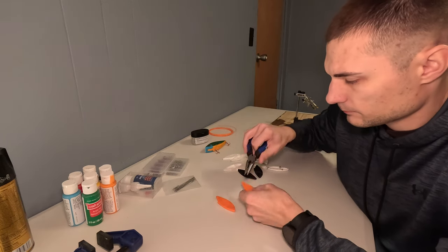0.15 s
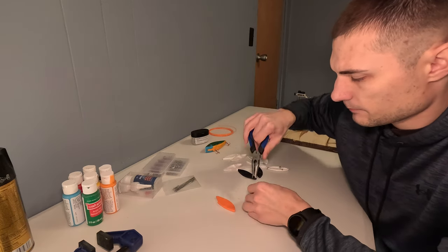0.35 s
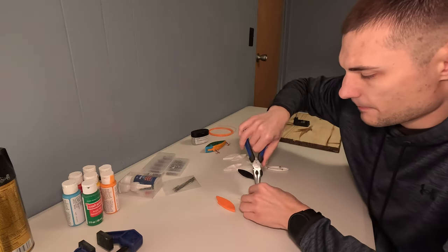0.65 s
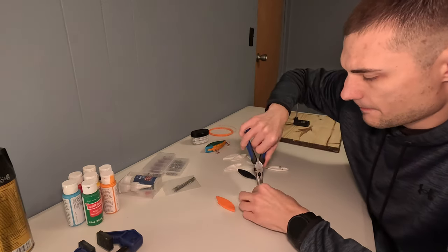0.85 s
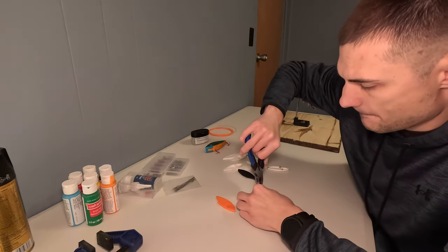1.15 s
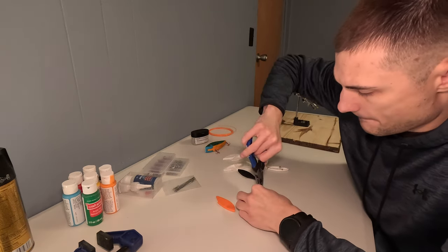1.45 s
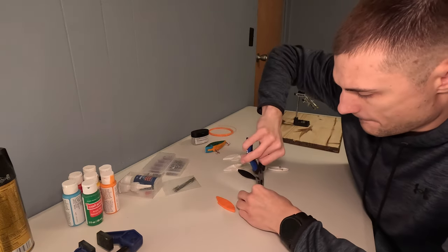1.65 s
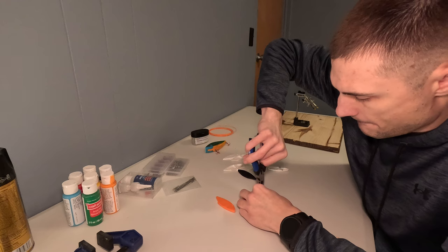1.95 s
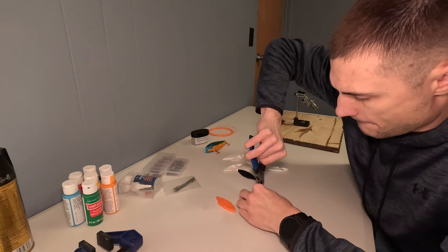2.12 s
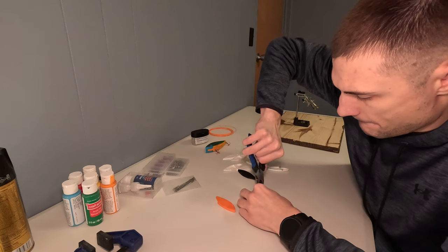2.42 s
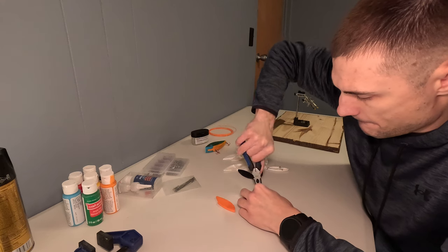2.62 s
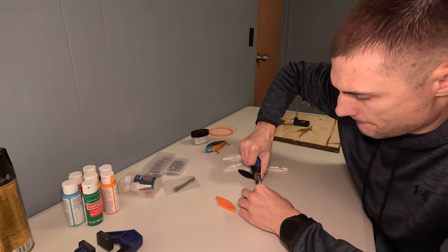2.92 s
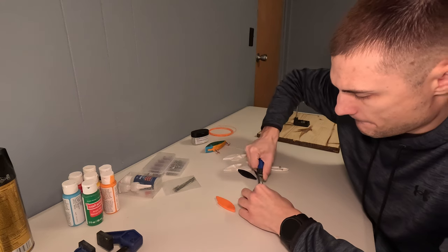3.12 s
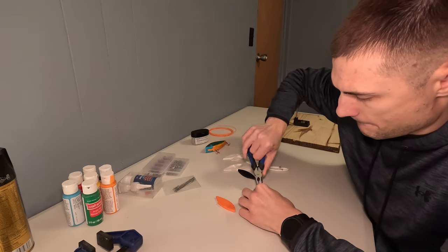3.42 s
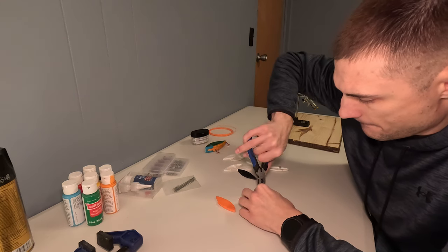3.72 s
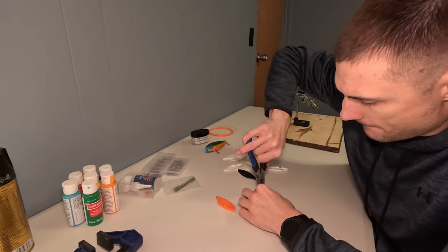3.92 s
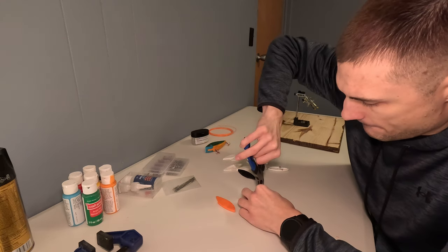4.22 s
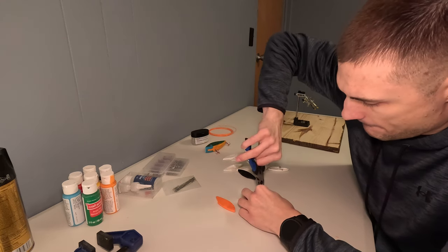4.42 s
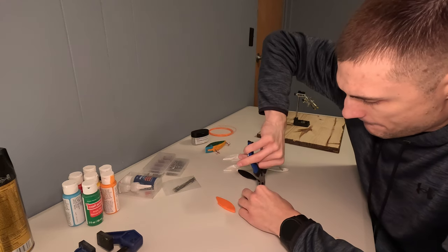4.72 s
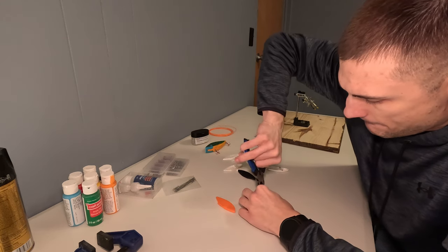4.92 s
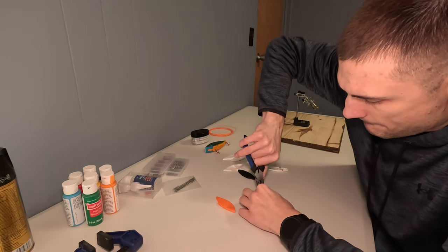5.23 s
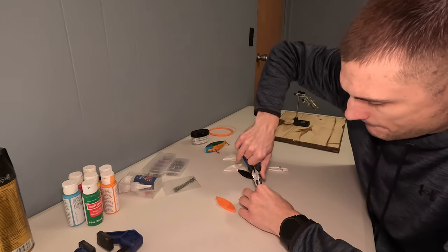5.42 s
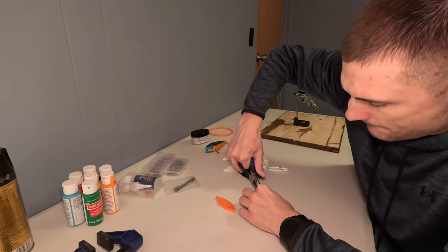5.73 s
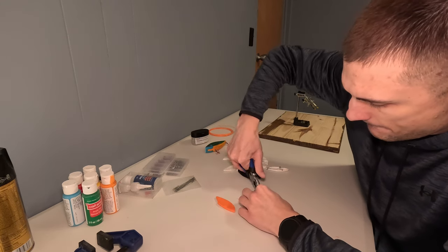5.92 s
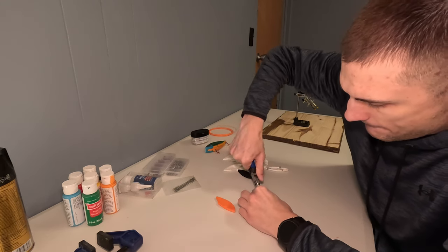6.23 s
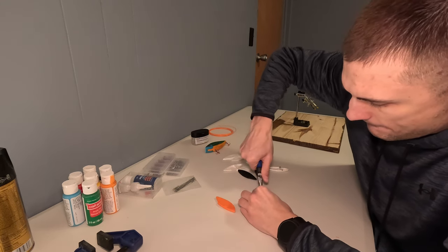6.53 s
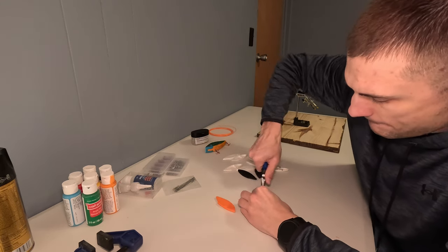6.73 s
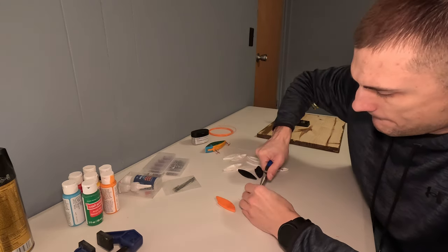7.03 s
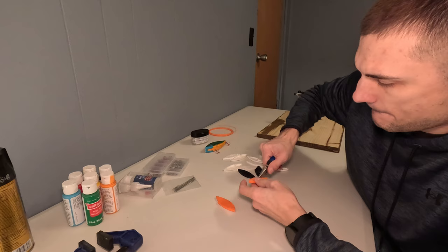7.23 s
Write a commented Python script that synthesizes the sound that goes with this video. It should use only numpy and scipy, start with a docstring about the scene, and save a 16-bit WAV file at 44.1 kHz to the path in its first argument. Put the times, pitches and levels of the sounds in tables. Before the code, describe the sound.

Sharp plastic cracks, a few very loud with a table thud, broken by knocks, brief scrapes and tiny ticks in a humming small room.

```python
"""Plastic struts crack and snap off a printed part as pliers twist them over a table in a small room.
Each crack is a burst of noise through table, part and bright crack bodies; some rows are wall echoes.
Knocks, a dull slip of the jaws and ticks use the same bodies; rubs are dense stick-slip clicks.
Jolts add a deep damped swing; shaped noise gives a steady low hum and faint hiss."""
import sys
import numpy as np
from scipy import signal
from scipy.fft import rfft, irfft
from scipy.io import wavfile
from scipy.ndimage import uniform_filter1d

SR = 44100
rng = np.random.default_rng(int(sys.argv[2]) if len(sys.argv) > 2 else 0)


def bounce(signal):
    """Save signal as a 16-bit WAV file at the path given by the first command-line argument."""
    frames = np.transpose(np.atleast_2d(signal))
    limited = np.clip(frames, -1, 1)
    pcm = np.round(limited * 32767).astype(np.int16)
    wavfile.write(sys.argv[1], SR, pcm)


N = 324576
ONSET_SAMPLES = 441  # 10 ms: strike and boom levels are RMS over this span
BAND_LIMIT_HZ = 16000

# room hum and hiss spectrum: freq_hz, relative_density_db
HUM_SPECTRUM = [(12, -26), (20, 3.5), (38, -11), (65, -2.5), (110, -7), (163, -11.5), (193, -21),
                (228, -17), (301, -27), (434, -31), (590, -40), (678, -37), (825, -43.5), (14700, -57),
                (16000, -55.5)]
HUM_RMS_DB = -39
# reverberation: freq_hz, t60_s
ROOM_T60 = [(100, 0.49), (300, 0.25), (700, 0.23), (2000, 0.23), (6000, 0.18), (9000, 0.16), (14000, 0.16)]

# jaws sliding on plastic: start_s, end_s, table_db, creak_db, grit_db
RUBS = [(0.108, 0.152, -59.5, -86, -51.5), (0.228, 0.443, -76, -62.5, -69.5),
        (0.652, 0.722, -48.5, -59, -65), (0.761, 0.799, -43, -62, -81), (0.91, 0.931, -51, -63, -58.5),
        (0.973, 1.045, -54, -67, -93), (2.079, 2.148, -53, -55.5, -56.5), (3.15, 3.218, -49, -57, -47),
        (3.87, 3.934, -55, -90, -72), (4.98, 5.042, -58.5, -64.5, -59), (6.539, 6.618, -54.5, -73, -61.5),
        (7.022, 7.175, -77, -58.5, -68.5)]
# creak of the part: freq_hz, relative_density_db
CREAK_COLOUR = [(400, -18), (1000, -30), (1900, -22), (2700, 5), (3450, 15), (3900, 3), (4600, -4),
                (7000, -10.5)]
# grit under the jaws: freq_hz, relative_density_db
GRIT_COLOUR = [(300, -24), (800, 20), (2000, 9), (3000, 9.5), (4300, -2.5), (6200, -1), (7500, -5.5),
               (15000, -19.5)]

# broad colour of the table: freq_hz, relative_density_db
TABLE_COLOUR = [(60, 3), (240, -9), (350, -4.5), (430, -0.5), (540, -0.5), (950, -7), (1300, -27),
                (2500, -22.5), (6000, -77)]
# broad colour of the part: freq_hz, relative_density_db
PART_COLOUR = [(300, -23), (900, 5.5), (1200, 3.5), (1500, -1), (1850, 3.5), (2700, -5.5), (3750, -1),
               (4500, -31), (5700, -4.5), (9000, -42.5)]
# broad colour of the crack: freq_hz, relative_density_db
CRACK_COLOUR = [(1500, -27), (4400, -4.5), (5700, 4), (7000, -0.5), (9300, 4), (11500, -2), (13500, -3),
                (16000, -15.5)]
# table ringing: freq_hz, energy_db (against broad colour), t60_s
TABLE_MODES = [(354, -5, .15), (526, -1.5, .1), (738, -13, .1), (968, -15, .08)]
# part ringing: freq_hz, energy_db (against broad colour), t60_s
PART_MODES = [(2685, -13.5, 0.016), (3300, -8.5, 0.0051), (3497, -10.5, 0.013)]
# crack ringing: freq_hz, energy_db (against broad colour), t60_s
CRACK_MODES = [(5470, -12.5, 0.028), (5780, -10, 0.017)]

# pliers and part bump the table: start_s, table_db, part_db
KNOCKS = [(0.451, -28.5, -35.5), (0.656, -40, -48.5), (0.7175, -21, -23), (0.745, -35, -40),
          (0.768, -33.5, -56), (0.834, -39, -59), (0.904, -41, -56.5), (1.23, -29.5, -53),
          (1.301, -33.5, -59), (1.318, -40.5, -62), (1.448, -50, -80), (1.52, -47.5, -72),
          (3.209, -45, -52), (3.227, -45.5, -45), (3.367, -47, -73), (3.537, -41.5, -65),
          (3.641, -34.5, -56), (6.219, -49.5, -79), (6.601, -40.5, -52), (7.31, -68, -51)]
KNOCK_CRACK_DB, KNOCK_TILT_DB_PER_OCT = -24, -10  # faint, dull crack: level against part; tilt

# struts crack or break; some rows are a crack's echo off a wall:
# start_s, strength_db (of the part), crispness_db (crack against part)
SNAPS = [(1.758, -23.5, -1), (2.117, -40, -5.5), (2.127, -42.5, -4.5), (2.1534, -42.5, 0),
         (2.164, -37.5, 5), (2.1679, -28.5, 0.5), (2.63, -50, 3), (2.753, -49.5, 0), (2.769, -58.5, 4),
         (2.915, -59, 17.5), (3.005, -40.5, 1.5), (3.436, -63.5, 15), (3.452, -60.5, 9.5),
         (4.166, -60, 4.5), (4.522, -46, 1), (4.541, -24.5, -3.5), (4.578, -32.5, -7.5),
         (5.32, -42.5, -1.5), (5.343, -42, -2), (5.36, -56.5, 10.5), (5.559, -41.5, -1), (6.449, -47.5, -1),
         (6.579, -46, 3.5), (6.86, -58.5, 5.5), (7.131, -65, 17), (7.149, -65.5, 14), (7.171, -68.5, 14),
         (7.31, -63.5, 22.5)]
MEDIUM_SNAP_DB = -40  # strength of a medium strut
SHAKE_DB, SHAKE_DB_PER_DB = 6, 0.25  # table against medium-strut strength; growth with strength
DULLING_DB_PER_OCT_PER_DB, MAX_TILT_DB_PER_OCT = 0.27, 3

# hand and part recoil onto the table: start_s, swing_envelope_peak_db, swing_hz
JOLTS = [(1.76, -2, 118), (2.1684, -4.5, 138.6), (3.538, -23.5, 83.5), (4.5421, -5, 127), (4.577, -5, 123),
         (5.018, -25, 111), (6.451, -24, 107), (6.585, -25, 111)]
BOOM_DB, BOOM_DB_PER_DB = -10.5, 1.75  # boom at a 0 dB swing; growth with swing level

# clear ticks of the strained part; one row is a tick's echo off a wall: start_s, part_db
TICKS = [(2.323, -59), (4.838, -58), (4.877, -60), (4.933, -53), (4.951, -49.5), (5.059, -52.5),
         (5.216, -54), (5.253, -55.5), (6.284, -51.5), (6.39, -50.5), (6.843, -57)]
# spans of faint random ticks: start_s, end_s
STRAINS = [(2.35, 2.45), (3.28, 3.78), (4.971, 5.9)]
FAINT_TICKS_PER_S, FAINT_TICK_DB, FAINT_TICK_SPREAD_DB = 7, -66, 1  # spread is plus or minus
TICK_TABLE_DB, TICK_CRACK_DB, TICK_TILT_DB_PER_OCT = -6, -2, 10  # levels against part; tilt

# jaws slip with a dull crack: start_s, table_db, part_db, crack_db, tilt_db_per_oct
SLIP = (3.176, -35, -43, -39.5, -23.5)


def amp(db):
    """Decibels to gain."""
    return 10 ** (np.asarray(db) / 20)


def unit(x):
    """Scale to unit energy."""
    return x / np.sqrt(np.sum(x ** 2) + 1e-20)


def onset_rms(x):
    """RMS over the onset span."""
    return np.sqrt(np.mean(x[:ONSET_SAMPLES] ** 2))


def read(points, hz):
    """Interpolate a table along log frequency."""
    freq_hz, value = np.transpose(points)
    return np.interp(np.log(hz + 1), np.log(freq_hz), value)


def add(mix, start_s, sound):
    """Add a sound into the mix in place."""
    part = mix[max(round(start_s * SR), 0):][:len(sound)]
    part += sound[:len(part)]


def hum():
    """Steady low room rumble and faint hiss: white noise shaped in frequency."""
    gain = amp(read(HUM_SPECTRUM, np.fft.rfftfreq(N, 1 / SR)))
    noise = irfft(rfft(rng.standard_normal(N)) * gain, N)
    return amp(HUM_RMS_DB) * np.sqrt(N) * unit(noise)


def ringing(modes, size=8192):
    """Struck object's modes: exponentially dying sines."""
    t = np.arange(size) / SR
    total = 0
    for hz, energy_db, t60_s in modes:
        tone = amp(-60 * t / t60_s) * np.sin(2 * np.pi * hz * t)
        total = total + amp(energy_db) * unit(tone)
    return total


def body(colour, modes=(), tilt_db_per_oct=0, corner_hz=SR, ripple_db=0, smooth_bins=25, size=4096):
    """Object's impulse response: minimum-phase broad colour plus modes; ripple is its small resonances."""
    hz = np.fft.rfftfreq(size, 1 / SR)
    ripple = rng.standard_normal(len(hz))
    for _ in range(2):
        ripple = uniform_filter1d(ripple, smooth_bins)
    octaves = np.log2(np.maximum(hz / corner_hz, 1))
    db = read(colour, hz) + tilt_db_per_oct * octaves + ripple_db * ripple / ripple.std()
    log_gain = np.log(amp(np.r_[db, db[-2:0:-1]]))
    # the Hilbert transform of log gain gives the minimum phase
    broad = unit(np.fft.ifft(np.exp(np.conj(signal.hilbert(log_gain)))).real)
    return unit(np.pad(broad, (0, size)) + ringing(modes, size=2 * size))


def table_body():
    """Table top: broad colour and low modes."""
    return body(TABLE_COLOUR, TABLE_MODES)


def room_tail(build_s=0.0034, size=256):
    """Diffuse reflections: noise that builds up, then decays at a frequency-dependent rate."""
    t = np.arange(SR // 3) / SR
    hz, frames_s, z = signal.stft(rng.standard_normal(len(t)), SR, nperseg=size)
    decay = amp(-60 * frames_s / read(ROOM_T60, hz)[:, None])
    tail = signal.istft(z * decay, SR, nperseg=size)[1][:len(t)]
    return unit(tail * (1 - np.exp(-(t / build_s) ** 2)))


def in_room(x, tail_db):
    """Direct sound plus reverberation."""
    return x + amp(tail_db) * signal.fftconvolve(x, room_tail())[:N]


def rubs(slips_per_s=600, spread_db=2.5):
    """Stick-slip of the jaws: random signed clicks of uneven size drive table, creak and grit."""
    bodies = table_body(), body(CREAK_COLOUR), body(GRIT_COLOUR)
    out = np.zeros(N)
    for start_s, end_s, *levels_db in RUBS:
        n = max(round((end_s - start_s) * SR), 64)
        times = rng.random(n) < slips_per_s / SR
        signs = rng.choice([-1, 1], n)
        sizes = amp(spread_db * np.minimum(rng.exponential(1, n), 4))
        slips = times * signs * sizes * signal.windows.tukey(n, 0.6)
        for response, db in zip(bodies, levels_db):
            add(out, start_s, amp(db) * np.sqrt(n) * unit(signal.fftconvolve(slips, response)))
    return out


def fracture(tear_s, size=768):
    """Tearing fibres: fading random impulses with a partly flattened spectrum."""
    fade = np.exp(-np.arange(size) / SR / tear_s)
    z = rfft(rng.laplace(size=size) * fade)
    flattened = irfft(z / np.sqrt(abs(z) + 1e-9))
    return unit(flattened * np.sqrt(fade))


def strike(response, db, tear_s, bounce_db, tail_db, wall_db=-17, bounce_s=0.0018, wall_s=0.013):
    """Fracture driving a body by direct, table-bounce, wall and diffuse paths, each with its own grain."""
    path = amp(tail_db) * room_tail()
    for delay_s, path_db in [(0, 0), (bounce_s, bounce_db), (wall_s, wall_db)]:
        add(path, delay_s, amp(path_db) * fracture(tear_s))
    ring = signal.fftconvolve(path, response)
    return amp(db) * ring / onset_rms(ring)


def click(table, table_db, part_db, crack_db, tilt_db_per_oct, part_tilt_share=0.48):
    """Impact driving table, part and crack by separate amounts; tilt colours part and crack."""
    part = body(PART_COLOUR, PART_MODES, part_tilt_share * tilt_db_per_oct, corner_hz=1300, ripple_db=3)
    crack = body(CRACK_COLOUR, CRACK_MODES, tilt_db_per_oct, corner_hz=6000, ripple_db=3.2)
    return (strike(table, table_db, tear_s=0.011, bounce_db=-6.5, tail_db=-6.5)
            + strike(part, part_db, tear_s=0.0079, bounce_db=-1, tail_db=-1.0)
            + strike(crack, crack_db, tear_s=0.0013, bounce_db=-4, tail_db=-3.5))


def knocks():
    """Blunt bumps on the table: faint, dull crack."""
    table = table_body()
    out = np.zeros(N)
    for start_s, table_db, part_db in KNOCKS:
        crack_db = part_db + KNOCK_CRACK_DB
        add(out, start_s, click(table, table_db, part_db, crack_db, KNOCK_TILT_DB_PER_OCT))
    return out


def snap(table, strength_db, crispness_db):
    """Strut crack or its echo: the stronger, the duller and the more table; thicker struts are stronger."""
    excess_db = strength_db - MEDIUM_SNAP_DB
    tilt_db_per_oct = min(-DULLING_DB_PER_OCT_PER_DB * excess_db, MAX_TILT_DB_PER_OCT)
    table_db = strength_db + SHAKE_DB + SHAKE_DB_PER_DB * excess_db
    return click(table, table_db, strength_db, strength_db + crispness_db, tilt_db_per_oct)


def snaps():
    """Strut cracks and breaks, and some wall echoes of them, on one table top."""
    table = table_body()
    out = np.zeros(N)
    for start_s, strength_db, crispness_db in SNAPS:
        add(out, start_s, snap(table, strength_db, crispness_db))
    return out


def jolts(swell_s=0.0061, sharpness=2.06, lag_s=0.0012, push_s=0.0021):
    """Recoil onto the table: a heavily damped swing, plus a soft push that booms the table modes."""
    t = np.arange(SR // 10) / SR
    out = np.zeros(N)
    envelope = (t / swell_s * np.exp(1 - t / swell_s)) ** sharpness
    push = np.sin(np.pi * np.minimum(t / push_s, 1)) ** 2
    boom = signal.fftconvolve(ringing(TABLE_MODES), push)
    boom = boom / onset_rms(boom)
    for start_s, db, hz in JOLTS:
        add(out, start_s, -amp(db) * envelope * np.sin(2 * np.pi * hz * (t - lag_s)))
        add(out, start_s, amp(BOOM_DB + BOOM_DB_PER_DB * db) * boom)
    return out


def tick(table, part_db):
    """Strain tick or its echo: bright part and crack, little table."""
    return click(table, part_db + TICK_TABLE_DB, part_db, part_db + TICK_CRACK_DB, TICK_TILT_DB_PER_OCT)


def ticks():
    """Strained part: clear ticks and a wall echo at set times, faint ticks at uneven intervals."""
    table = table_body()
    out = np.zeros(N)
    for start_s, part_db in TICKS:
        add(out, start_s, tick(table, part_db))
    for start_s, end_s in STRAINS:
        span_s = end_s - start_s
        count = max(round(span_s * FAINT_TICKS_PER_S), 1)
        # one tick at random within each equal slot
        for k, (place, size) in enumerate(rng.random((count, 2))):
            part_db = FAINT_TICK_DB + FAINT_TICK_SPREAD_DB * (1 - 2 * size)
            add(out, start_s + span_s * (k + place) / count, tick(table, part_db))
    return out


def slip():
    """Slipping jaws: one click with a strongly dulled part and crack."""
    start_s, *settings = SLIP
    out = np.zeros(N)
    add(out, start_s, click(table_body(), *settings))
    return out


def scene():
    """Sum of all layers, one channel."""
    sliding = in_room(rubs(), tail_db=-1.0)
    thumps = in_room(jolts(), tail_db=-18.5)
    return (hum() + sliding + knocks() + snaps() + thumps + ticks() + slip())[None]


def record(dry, knee=10):
    """Soft limit at full scale, then linear-phase low-pass."""
    limited = dry / (1 + abs(dry) ** knee) ** (1 / knee)
    lowpass = signal.firwin(401, BAND_LIMIT_HZ, window=("kaiser", 9), fs=SR)
    return signal.oaconvolve(limited, lowpass[None], "same")


dry = scene()
out = record(dry)
bounce(out)
```